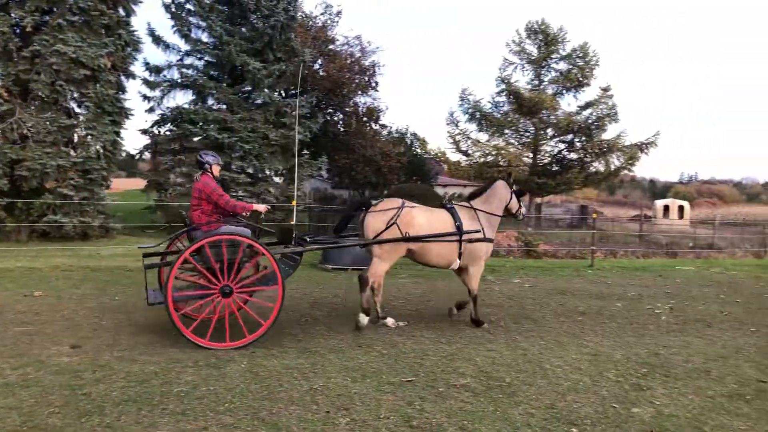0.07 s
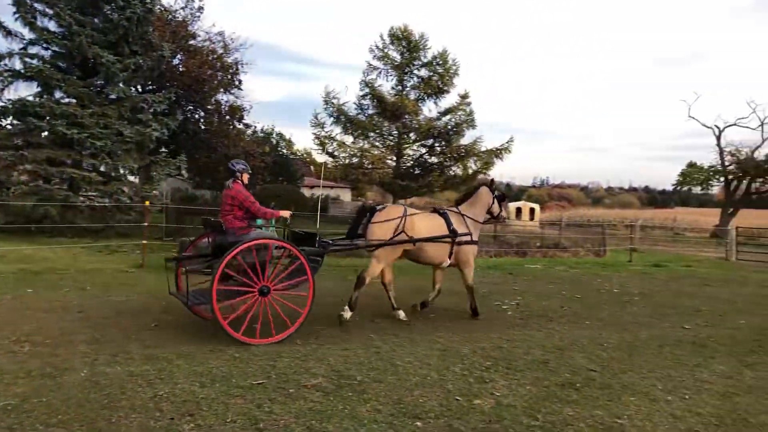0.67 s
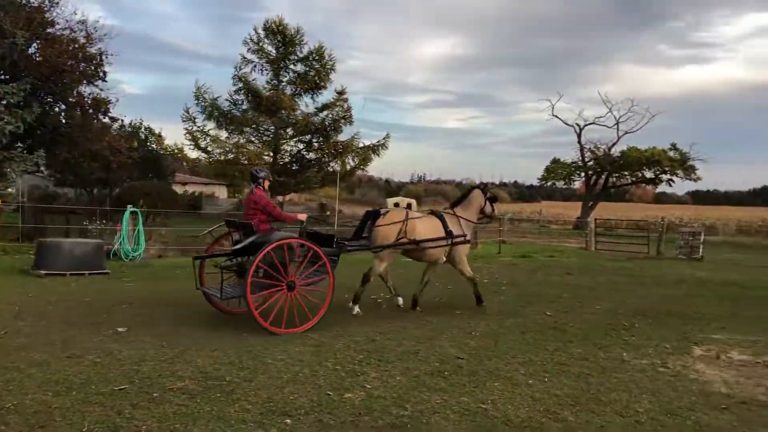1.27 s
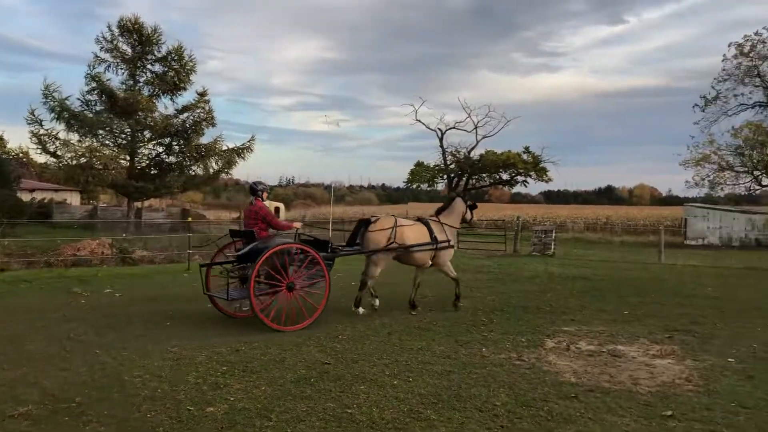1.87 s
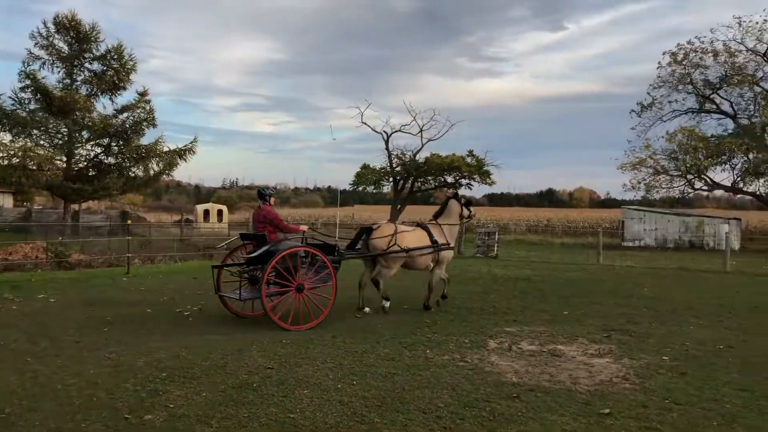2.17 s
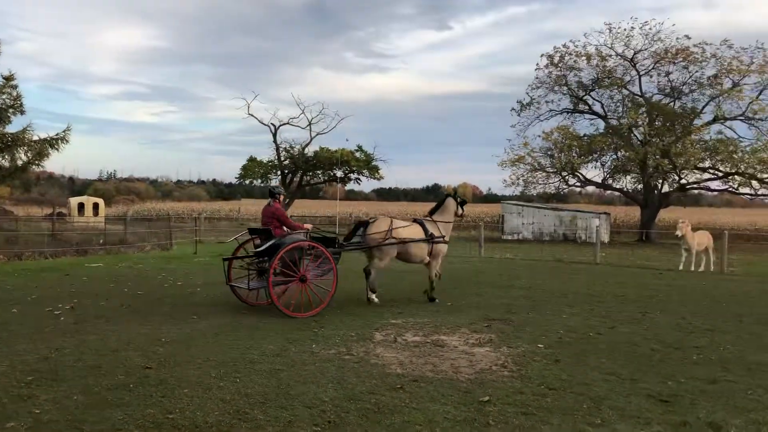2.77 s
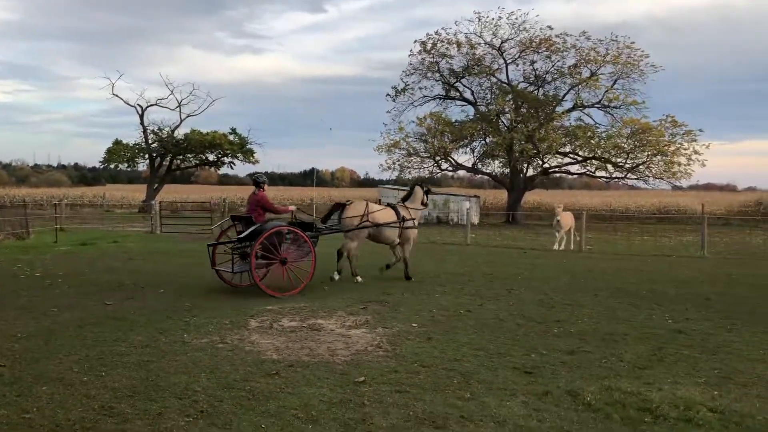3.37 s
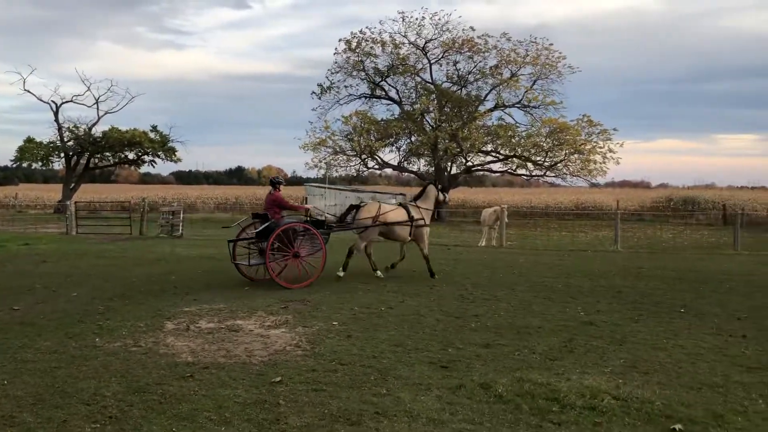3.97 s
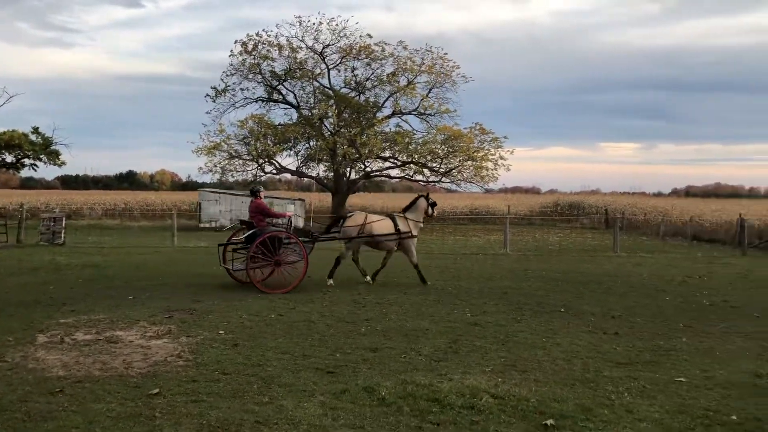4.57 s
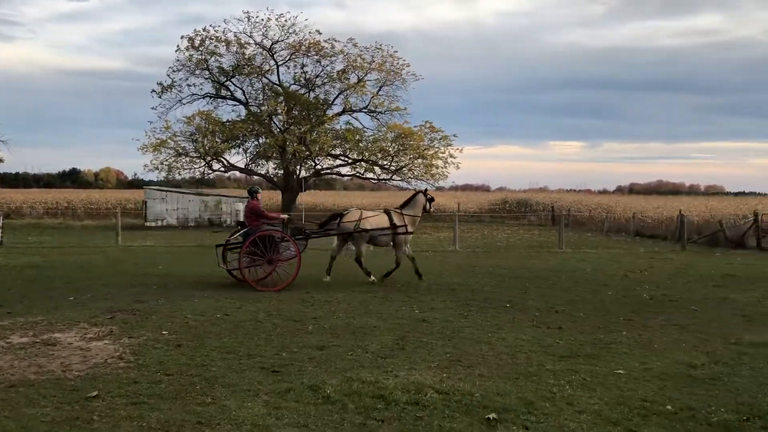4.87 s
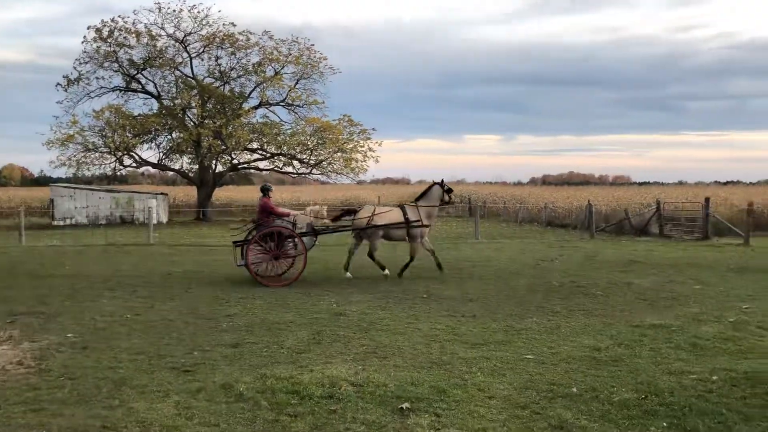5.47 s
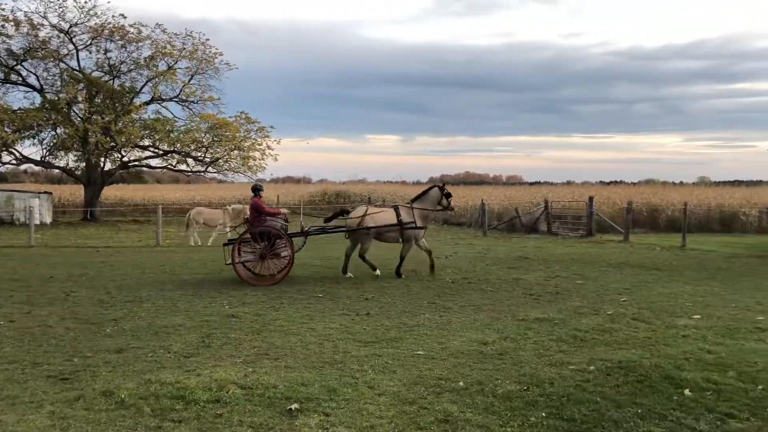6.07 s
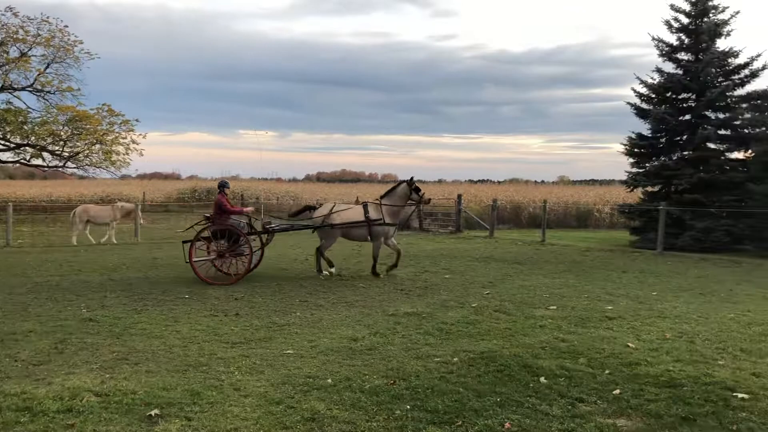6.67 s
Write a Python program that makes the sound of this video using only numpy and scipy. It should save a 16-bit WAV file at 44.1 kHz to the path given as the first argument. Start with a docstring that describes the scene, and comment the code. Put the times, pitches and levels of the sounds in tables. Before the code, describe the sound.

A horse-drawn cart clicks and rattles softly over a grassy field, while gusty wind rumbles and flutters on the microphone.

```python
"""An open grass field, where a trotting horse draws a two-wheeled cart away. Hoofs swish through the
grass on each beat; struck cart parts tick and knock, and harness metal tinkles in its natural modes.
Gusts buffet the single microphone, shedding eddies that grow higher as they grow stronger.
Distant air rushes behind, and one short high chirp sounds near the end."""
import sys
import numpy as np
from scipy import signal
from scipy.fft import rfft, irfft, next_fast_len
from scipy.io import wavfile
from scipy.ndimage import map_coordinates

SR = 44100
rng = np.random.default_rng(int(sys.argv[2]) if len(sys.argv) > 2 else 0)


def put_to_file(sound):
    """Save the sound as 16-bit audio at rate SR, in the file named by the first command-line argument."""
    columns = np.atleast_2d(sound).T  # one column per channel
    safe = np.clip(columns, -1, 1)
    whole_steps = np.round(safe * 32767)
    wavfile.write(sys.argv[1], SR, whole_steps.astype(np.int16))


N = 296793

# slow course of the distant air, which the wheel grit also follows: (time [s], level [dB])
AIR_LEVEL = [(0, -49.5), (.85, -49.7), (1.6, -51.5), (3.0, -53), (4.4, -54), (6.73, -53)]
# spectrum of a dull impact: (frequency [Hz], relative level [dB])
IMPACT_SPECTRUM = [(100, -48), (400, -32), (900, 11.5), (1300, 1.5), (2000, -14.5), (4000, -12.5),
                   (9000, -32)]
# the clearest dry ticks of cart and stalks: (time [s], level [dB], low-band gain [dB], high-band gain [dB])
DRY_TICKS = [(.012, -36, -20, -34), (.122, -39.5, -5, -23), (.44, -42, -13, -13), (.5338, -32.5, -19, -21),
             (.5851, -41.5, 0, -31), (0.621, -42, -1, -32), (.9083, -42.5, -16, -8), (.969, -38.5, -3, -17),
             (0.997, -35.5, -19, -21), (1.1309, -36.5, -3, -23), (1.337, -43, -6, -11),
             (1.51, -36.5, -15, -33), (1.5254, -47, -17, 2), (1.5897, -35.5, -21, -20),
             (1.676, -41.5, -14, -13), (2.0123, -46, -16, 6), (2.172, -37, -14, -13),
             (2.524, -42.5, -16, -19), (2.58, -41, -15, -16), (2.7058, -42, -18, -15),
             (2.8157, -36.5, -10, -23), (2.889, -40.5, -18, -22), (3.1743, -41, -11, -27),
             (3.677, -37, -19, -7), (3.717, -41.5, -24, -17), (3.836, -38.5, -16.5, -15),
             (4.0332, -44, -11, -5), (4.0873, -38, -10, -14), (4.114, -48, -22, -18),
             (4.1476, -40.5, -11, -12), (4.184, -43.5, -7, -21), (4.2537, -44, -10.5, -16),
             (4.424, -42, -13, -22), (4.446, -40, -16, -8), (5.4296, -45.5, -30, -11),
             (5.5982, -43.5, -4, -31), (5.7317, -39, -17, -20), (5.75, -42.5, -14, -24),
             (6.043, -43, -11, -30), (6.0774, -40.5, -5, -20), (6.366, -41.5, -23, -8),
             (6.4056, -42.5, -21, -19), (6.437, -45.5, -23, -12), (6.6744, -36, -10, -21)]
HOOF_BEATS_S = np.arange(.232, N / SR, .3228)  # in a trot, a diagonal pair of hoofs lands on each beat
RECEDE_DB_PER_S = -0.72  # the cart draws away


def amp(db):
    """Decibels to amplitude ratio."""
    return 10 ** (np.asarray(db) / 20)


def power_db(power):
    """Power ratio to decibels."""
    return 10 * np.log10(power + 1e-20)


def unit(x):
    """Normalise to rms 1."""
    return x / np.sqrt(np.mean(x ** 2) + 1e-20)


def curve(rows):
    """Linear interpolation of (time [s], value) rows at every sample."""
    return np.interp(np.arange(N) / SR, *np.transpose(rows))


def wobble(rate):
    """Smooth random modulation: a spline through rate knots a second."""
    return map_coordinates(rng.standard_normal(int(N * rate / SR) + 4), [np.arange(N) * rate / SR])


def swell(s, rise_s, fall_s, shape):
    """An envelope of height 1 at time s; shape 1 gives a pointed crest, 2 a round one."""
    first, last = np.clip(np.array([s - 4 * rise_s, s + 4 * fall_s]) * SR, 0, N).astype(int)
    t, out = np.arange(first, last) / SR - s, np.zeros(N)
    out[first:last] = np.exp(-np.abs(t / np.where(t < 0, rise_s, fall_s)) ** shape)
    return out


def colour(x, points):
    """Spectral shaping by (frequency [Hz], level [dB]) points on a log axis; the result has rms 1."""
    size = next_fast_len(len(x))
    hz, db = np.transpose(points)
    gain = amp(np.interp(np.log(np.fft.rfftfreq(size, 1 / SR) + 1), np.log(hz), db))
    return unit(irfft(rfft(x, size) * gain, size)[:len(x)])


def add(track, s, sound):
    """Superpose a sound on the track at time s."""
    start = int(np.clip(round(s * SR), 0, N))
    track[start:start + len(sound)] += sound[:N - start]


def distant_air():
    """Broadband flow noise: air moving far away makes a soft, steady rush."""
    # spectrum of the rush: (frequency [Hz], relative level [dB])
    spectrum = [(60, -30), (200, 6), (330, 0), (600, 4.5), (1000, 1.5), (1500, -2.5), (2200, -9.5),
                (3000, -18.5), (6000, -20.5), (12000, -57), (16000, -57)]
    return amp(curve(AIR_LEVEL)) * colour(rng.standard_normal(N), spectrum)


def chirp(s=5.950, length_s=0.011, start_hz=4960, end_hz=4760, level_db=-35.5, echo_t60=0.13):
    """A falling sweep of three harmonics, with a faint tail from scattering over the field."""
    progress = np.linspace(0, 1, int(length_s * SR))
    phase = 2 * np.pi * np.cumsum(start_hz + (end_hz - start_hz) * progress) / SR
    harmonics = sum(amp(db) * np.sin(k * phase) for k, db in enumerate([0, -15, -26], 1))
    note = np.sqrt(np.abs(np.sin(np.pi * progress))) * harmonics
    out, t = np.zeros(N), np.arange(SR // 5) / SR
    echo = amp(-60 * t / echo_t60) * rng.standard_normal(len(t))
    add(out, s, note)
    add(out, s + .004, amp(-23) * signal.fftconvolve(note, echo / np.linalg.norm(echo)))
    return amp(level_db) * out


def gusts(rise_share=0.52, shape=1.53, lag_s=0.013, stretch=1.4, calm_db=-9):
    """Incoherent addition: gusts and breeze sum in power, giving buffeting and turbulence levels in dB."""
    # buffeting of the breeze between gusts: (time [s], level [dB])
    breeze = [(0, -51.5), (.55, -50), (.85, -53.5), (2.0, -51), (2.25, -45), (2.65, -49.5), (2.95, -49.5),
              (3.3, -41.5), (4.1, -43), (4.38, -46.5), (5.1, -44), (6.73, -45.5)]
    # gusts on the microphone: (time [s], turbulence level [dB], buffeting level [dB], time scale [s])
    crests = [(0.233, -47, -41.5, 0.029), (.535, -50, -44, .07), (1.235, -58, -45.5, 0.035),
              (1.721, -68, -41, 0.017), (2.162, -26.5, -32.5, 0.09), (2.35, -37, -44, 0.11),
              (2.426, -30.5, -36, 0.082), (3.15, -33.5, -41, .09), (3.244, -34, -37, 0.065),
              (3.319, -33, -33.5, 0.03), (3.45, -33.5, -41, 0.099), (3.748, -35.5, -41.5, 0.19),
              (3.909, -30, -39, 0.087), (4.009, -25.5, -27.5, 0.1), (4.186, -34.5, -38.5, 0.055),
              (4.538, -19, -34, 0.13), (4.672, -24.5, -24, 0.041), (4.78, -31.5, -31.5, 0.058),
              (4.92, -48, -29.5, 0.028), (5.226, -32, -32, 0.11), (5.361, -36, -29.5, 0.042),
              (5.604, -35, -38.5, 0.11), (5.814, -34.5, -36, 0.048), (5.927, -34, -33.5, 0.086),
              (6.323, -46, -38, 0.061), (6.636, -50, -38.5, 0.087)]
    breeze_db = curve(breeze)
    buffet, turbulence = amp(breeze_db) ** 2, amp(breeze_db + calm_db) ** 2
    for s, turbulence_db, buffet_db, span_s in crests:
        rise, fall = span_s * rise_share, span_s * (1 - rise_share)
        turbulence += (amp(turbulence_db) * swell(s, rise, fall, shape)) ** 2
        # the slow buffeting comes later and lasts longer
        buffet += (amp(buffet_db) * swell(s + lag_s, stretch * rise, stretch * fall, shape)) ** 2
    return power_db(buffet), power_db(turbulence)


def eddy(hz, life, glide):
    """A convected vortex: its pressure oscillation sinks in pitch as it drifts off the microphone port."""
    cycles = np.arange(SR // 14) / SR * hz
    age = cycles / (2 * life)
    phase = 2 * np.pi * (glide * np.log1p(cycles / glide) + rng.random())
    return (age * np.exp(1 - age)) ** 2 * np.sin(phase)


def eddies(turbulence_db, force_db, centre_hz=285, db_per_octave=34, count=1100):
    """Vortex shedding: stronger turbulence sheds louder, higher eddies."""
    # the hardest eddies: (time [s], level [dB], starting frequency [Hz], life [cycles])
    hard_eddies = [(.236, -31.5, 406, 1.8), (.535, -35, 450, 0.88), (2.1462, -20, 1620, 1.6),
                   (2.147, -10, 780, 2.2), (2.17, -30, 1000, 1.7), (2.345, -32.5, 510, 1.5),
                   (2.439, -23.5, 960, 1.44), (2.813, -34, 825, 2.6), (3.179, -20.5, 720, 1.35),
                   (3.248, -26, 470, 2), (3.304, -27.5, 720, 2.9), (3.329, -32.5, 870, 1.2),
                   (3.684, -26.5, 630, 2.1), (3.704, -28, 746, 1.8), (3.742, -26, 606, 1.96),
                   (3.887, -20, 1005, 2.2), (3.973, -21.5, 560, 2.7), (3.988, -24, 870, 1.06),
                   (4.039, -15.5, 708, 1.5), (4.183, -24.5, 666, 4.5), (4.496, -19.5, 974, 2.9),
                   (4.509, -14, 710, 0.85), (4.533, -13, 783, 1.26), (4.575, -15.5, 1090, 1.43),
                   (4.657, -22, 694, 1.2), (4.764, -28, 680, 3.3), (5.220, -18.5, 540, 2.1)]
    out = np.zeros(N)
    onsets = ((np.arange(count) + rng.random(count)) * N / count).astype(int)
    for onset, (size, pitch) in zip(onsets, rng.standard_normal((count, 2))):
        hz = centre_hz * 2 ** (force_db[onset] / db_per_octave + .5 * np.tanh(pitch))
        gain = amp(turbulence_db[onset] - 3 + 6.7 * np.tanh(size))
        add(out, onset / SR, gain * eddy(hz, life=1.18, glide=2.65))
    for s, db, hz, life in hard_eddies:
        add(out, s, amp(db - 0.5) * eddy(hz, life, glide=2.99))
        # a hard eddy breaks up: a weaker one follows
        delay_s = rng.uniform(0.00307, 0.00883)
        add(out, s + delay_s, amp(db - 6) * eddy(hz * rng.uniform(0.641, 1), life=1.01, glide=3.6))
    return out


def wind(reference_db=-37, flutter_growth=1.57):
    """Pressure fluctuations at the microphone: buffeting rumbles; turbulence sheds eddies and flutters."""
    # slow buffeting: (frequency [Hz], relative level [dB])
    rumble_spectrum = [(20, -31), (35, -19), (55, -2.5), (75, 1), (110, -2), (160, -4.5), (260, -17),
                       (500, -55), (1000, -72)]
    # torn air in the strongest gusts: (frequency [Hz], relative level [dB])
    flutter_spectrum = [(150, -16), (280, 2), (450, 2), (620, 0), (790, -11.5), (1050, -19), (1400, -48),
                        (2200, -67)]
    buffet_db, turbulence_db = gusts()
    force_db = turbulence_db - reference_db
    rumble = amp(buffet_db + 1 + 2 * wobble(18)) * colour(rng.standard_normal(N), rumble_spectrum)
    flutter_db = reference_db - 19 + flutter_growth * force_db + 5.6 * wobble(160)
    flutter = amp(flutter_db) * colour(rng.standard_normal(N), flutter_spectrum)
    return rumble + flutter + eddies(turbulence_db, force_db)


def wheel_grit(relative_db=-8, grains_per_s=700):
    """Shot noise: wheels rolling on turf make a fine grit of random impulses."""
    grains = (rng.random(N) < grains_per_s / SR) * rng.standard_normal(N)
    return amp(curve(AIR_LEVEL) + relative_db) * colour(grains, IMPACT_SPECTRUM)


def jingle(touches, modes, gain_db, scatter_db, detune, chatter_db, chatter_s=0.025, contacts=3):
    """Modal ringing: each touch excites a slightly different metal part, which chatters as it settles."""
    out, t = np.zeros(N), np.arange(SR // 7) / SR
    hz, db, t60 = np.transpose(modes)[:, :, None]
    for s, touch_db in touches:
        pitch = hz * (1 + detune * rng.standard_normal(hz.shape))
        for k in range(contacts):
            gains = amp(db + scatter_db * rng.standard_normal(hz.shape))
            ring = gains * amp(-60 * t / t60) * np.sin(2 * np.pi * (pitch * t + rng.random(hz.shape)))
            # rubbing against leather makes the ring waver
            waver = amp(2.9 * map_coordinates(rng.standard_normal(128), [t * 200]))
            ping = ring.sum(0) / np.linalg.norm(gains) * waver * (1 - np.exp(-t / 0.0012))
            delay_s = k * chatter_s * (.5 + rng.random())
            add(out, s + delay_s, amp(touch_db + gain_db + k * chatter_db) * ping)
    return out


def harness(quiver_db=-67, quiver_count=40):
    """Impact excitation: small harness metal, never quite still, tinkles, and a buckle clinks."""
    # contacts of the small metal and of the buckle: (time [s], level [dB])
    tinkles = [(.411, -54), (.5836, -54), (.9971, -50), (1.4007, -52), (1.5095, -46), (1.5868, -51),
               (1.7574, -54), (1.8956, -49), (2.141, -40), (2.2218, -48), (2.7945, -52), (2.9971, -49),
               (3.1263, -54), (3.3608, -49), (3.4575, -42.5), (3.5643, -49), (3.6162, -46), (4.2303, -56),
               (4.5401, -52), (4.8464, -55), (4.9477, -51), (5.1347, -53), (5.239, -55), (5.5488, -58),
               (5.8351, -44), (6.3969, -52), (6.4607, -44), (6.6448, -51)]
    clinks = [(.621, -66), (.998, -54), (1.590, -52), (4.163, -65)]
    # their natural modes: (frequency [Hz], relative level [dB], 60 dB decay time [s])
    metal_modes = [(14600, 13, 0.049), (14740, -1, 0.19), (14970, -25, 0.09), (15360, -5, .12)]
    buckle_modes = [(5160, -5, .08), (10400, -9, .12), (10800, 6, 0.066)]
    quivers = rng.random((quiver_count, 2)) * [N / SR, 8] + [0, quiver_db]
    metal = jingle([*tinkles, *quivers], metal_modes, gain_db=-0.5, scatter_db=7, detune=.006,
                   chatter_db=-9.5)
    buckle = jingle(clinks, buckle_modes, gain_db=3.5, scatter_db=10, detune=.001, chatter_db=-11)
    return metal + buckle


def faint_ticks(level_db=-48, low_db=-12, high_db=-16):
    """Periodic forcing with jitter: each hoof beat jolts a tick out of the cart; rows as in DRY_TICKS."""
    jitter = rng.standard_normal((len(HOOF_BEATS_S), 4)) * [0.051, 2, 5, 5]
    return jitter + [[s, level_db + RECEDE_DB_PER_S * s, low_db, high_db] for s in HOOF_BEATS_S]


def ticks(crack_t60=0.0087, rattle_t60=0.067, ring_t60=0.024, rise_s=0.00025, bounce_s=.01):
    """Impact transients: each tick is a broadband crack with a grainy rattle, resonances and a bounce."""
    out, t = np.zeros(N), np.arange(SR // 10) / SR
    for s, db, low_db, high_db in [*DRY_TICKS, *faint_ticks()]:
        spectrum = [(500, low_db - 13), (1500, low_db + 4), (3300, low_db), (6300, -22.0),
                    (11000, high_db - 9.5), (16000, high_db - 7.5)]
        crack = amp(-60 * t / crack_t60) * colour(rng.standard_normal(len(t)), spectrum)
        grains = rng.standard_normal(len(t)) * (rng.random(len(t)) < .05)
        rattle = amp(-16 - 60 * t / rattle_t60) * colour(grains, spectrum)
        modes = np.sin(2 * np.pi * rng.uniform(1792, 11030, size=(6, 1)) * t).sum(0)
        ring = amp(-8 - 60 * t / ring_t60) * colour(modes, spectrum)
        tick = amp(db) * (crack + rattle + ring) * (1 - np.exp(-t / rise_s))
        add(out, s, tick)
        add(out, s + bounce_s * (.5 + rng.random()), amp(-13) * tick)
    return out


def clatter(level_db=-46, spread_db=4, wood_hz=2000, octaves=0.87, life_cycles=4.2, scatter_s=.075):
    """Damped free vibration: loose cart parts tap six times around each hoof beat, each a woody note."""
    out, t = np.zeros(N), np.arange(SR // 30) / SR
    for s in HOOF_BEATS_S:
        for when, size, pitch in rng.standard_normal((6, 3)):
            hz = wood_hz * 2 ** (octaves * np.tanh(pitch))
            tap = np.exp(-t * hz / life_cycles) * np.sin(2 * np.pi * hz * t)
            gain = amp(level_db + RECEDE_DB_PER_S * s + spread_db * np.tanh(size))
            add(out, s + scatter_s * when, gain * tap)
    return out


def knocks(gain_db=-5, damped_t60=0.052, settle_db=-13, settle_t60=0.2):
    """Two-stage decay: blunt blows ring woody modes, damped fast by turf and leather, then settling."""
    # dull blows of hoofs and shafts: (time [s], level [dB])
    blows = [(1.131, -40), (1.214, -37), (1.25, -41), (1.5119, -34), (1.558, -44), (1.843, -37.5),
             (1.879, -40.5), (2.566, -40), (2.815, -38), (2.867, -38), (3.343, -45), (4.092, -39.5),
             (4.156, -38), (5.029, -42), (6.309, -46), (6.674, -44)]
    out, t = np.zeros(N), np.arange(SR // 10) / SR
    decay = amp(-60 * t / damped_t60) + amp(settle_db - 60 * t / settle_t60)
    for s, db in blows:
        wood = np.sin(2 * np.pi * rng.uniform(643, 1500, size=(3, 1)) * t).sum(0)
        thud = colour(rng.standard_normal(len(t)), IMPACT_SPECTRUM)
        add(out, s, amp(db + gain_db) * decay * unit(thud + amp(-2) * unit(wood)))
    return out


def grass_envelope(hoof_db=-63, wheel_db=-59, stir_db=-18.5):
    """Hoof beats, rolling wheels and ticks all stir the grass; their contributions add in power."""
    hoofs = amp(hoof_db) * sum(swell(s, rise_s=0.096, fall_s=0.051, shape=2.3) for s in HOOF_BEATS_S)
    wheels = amp(wheel_db + RECEDE_DB_PER_S * np.arange(N) / SR + 2 * wobble(12))
    stirs = sum(amp(db + stir_db) * swell(s, rise_s=0.0045, fall_s=0.026, shape=0.74)
                for s, db, *_ in DRY_TICKS)
    return np.sqrt(wheels ** 2 + hoofs ** 2 + stirs ** 2)


def grass(brush_db=-4, crackle_db=-5, clump_db=3, stalk_hz=2800, life_cycles=3, count=1300):
    """Friction and fracture: blades brush and dry stalks snap in clumps under hoofs and wheels."""
    # brushing blades: (frequency [Hz], relative level [dB])
    spectrum = [(500, 12.5), (1500, 3.5), (3500, 9), (5500, 0), (8000, -0.5), (12000, -3.5), (16000, -3)]
    patter = rng.standard_normal(N) * amp(2.1 * wobble(500))  # dense tiny contacts
    brush = amp(brush_db + 2.9 * wobble(35)) * colour(patter, spectrum)
    snaps, t = np.zeros(N), np.arange(SR // 100) / SR
    for when, (pitch, size) in zip(rng.random(count), rng.standard_normal((count, 2))):
        hz = np.clip(stalk_hz * np.exp(.5 * pitch), SR / 40, SR / 3)
        snap = np.exp(-t * hz / life_cycles) * np.sin(2 * np.pi * hz * t)
        add(snaps, when * N / SR, amp(2.4 * np.tanh(size)) * snap)
    envelope = grass_envelope()
    crackle = amp(crackle_db) * unit(snaps * amp(clump_db * wobble(30)))
    return envelope * (brush + crackle)


def scene():
    """Linear superposition of horse, cart, air and chirp at one microphone."""
    return (harness() + wind() + wheel_grit() + distant_air() + grass()
            + ticks() + clatter() + knocks() + chirp())[None]


def record(dry, cutoff_hz=16000):
    """Band limiting: an ideal low-pass filter removes everything above the cutoff."""
    size = next_fast_len(N + SR // 4)
    passband = np.fft.rfftfreq(size, 1 / SR) < cutoff_hz
    return irfft(rfft(dry, size) * passband, size)[:, :N]


dry = scene()
out = record(dry)
put_to_file(out)
```